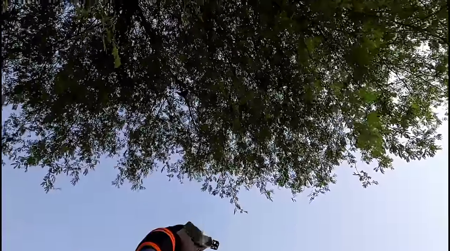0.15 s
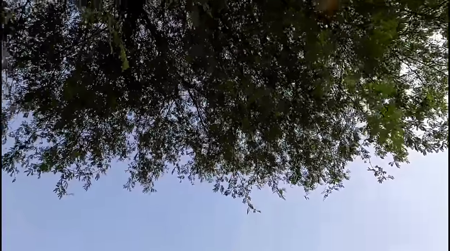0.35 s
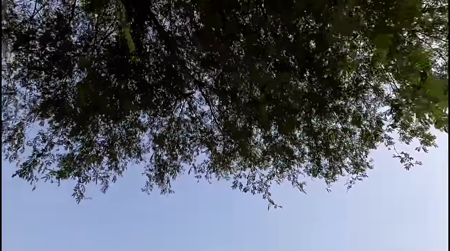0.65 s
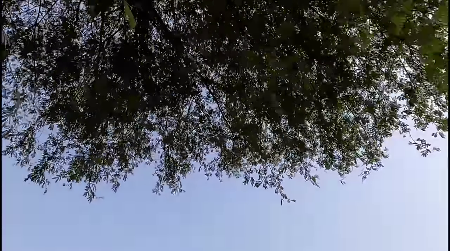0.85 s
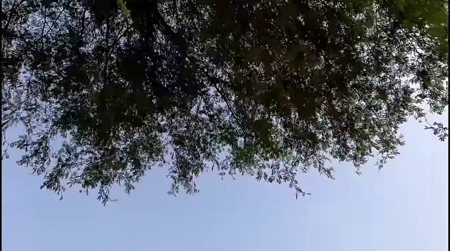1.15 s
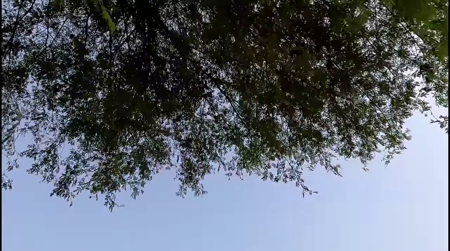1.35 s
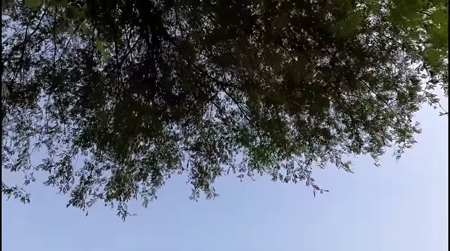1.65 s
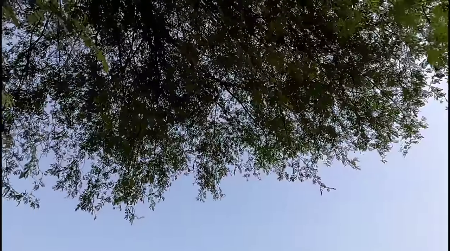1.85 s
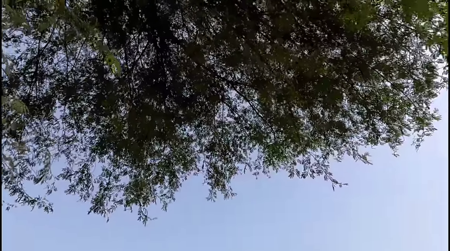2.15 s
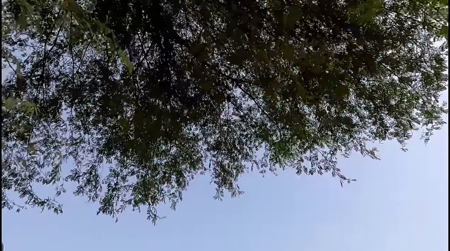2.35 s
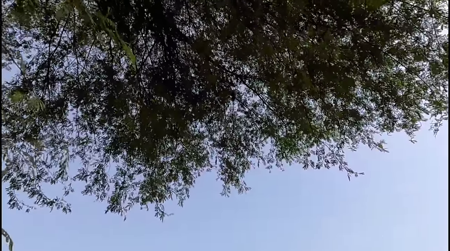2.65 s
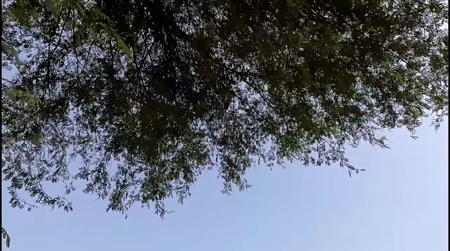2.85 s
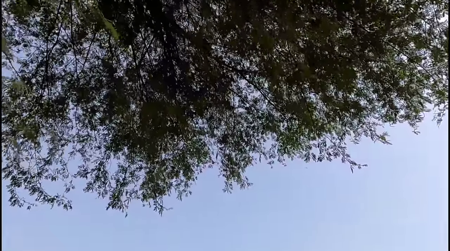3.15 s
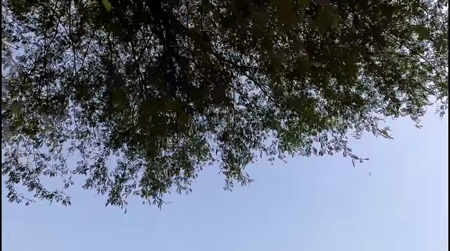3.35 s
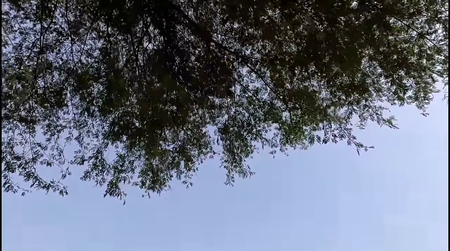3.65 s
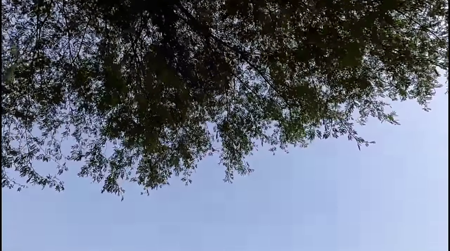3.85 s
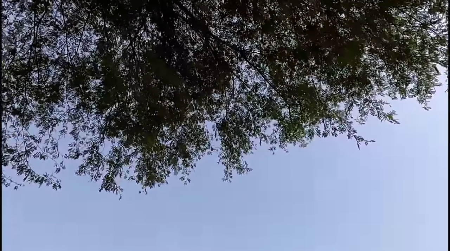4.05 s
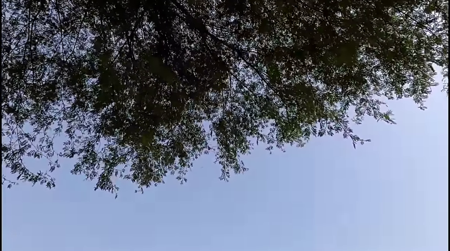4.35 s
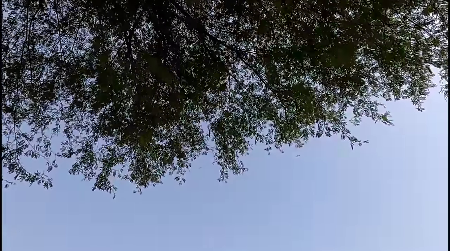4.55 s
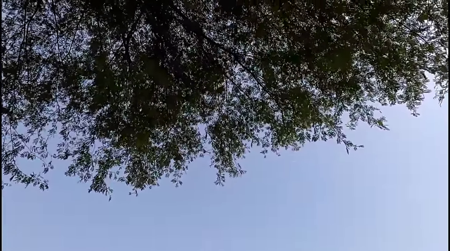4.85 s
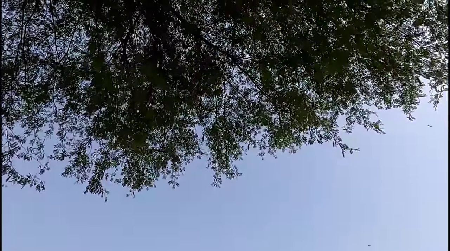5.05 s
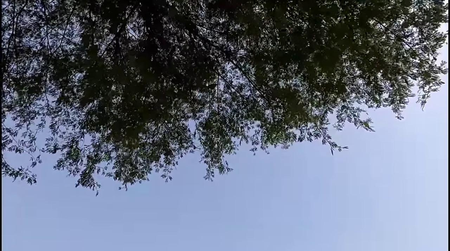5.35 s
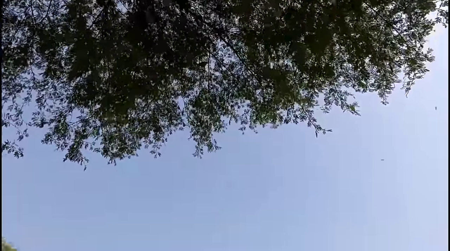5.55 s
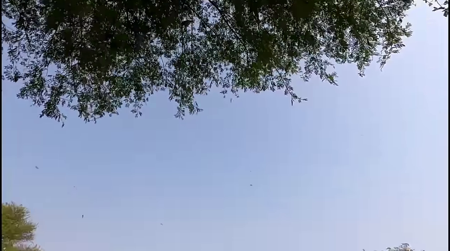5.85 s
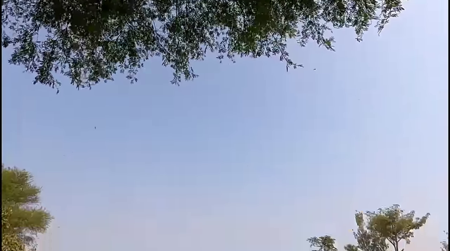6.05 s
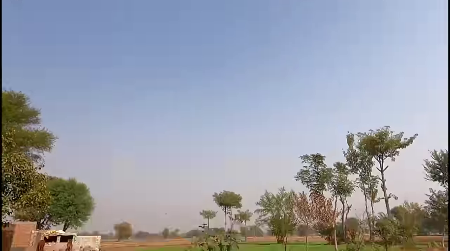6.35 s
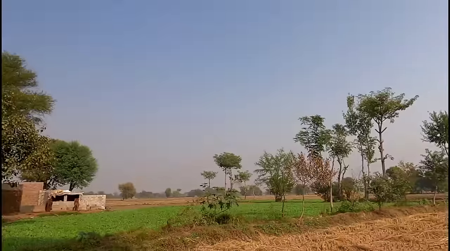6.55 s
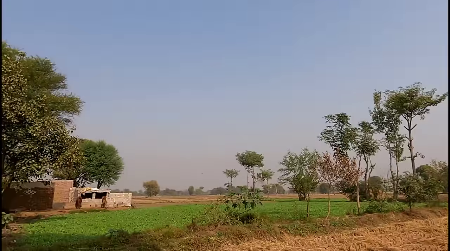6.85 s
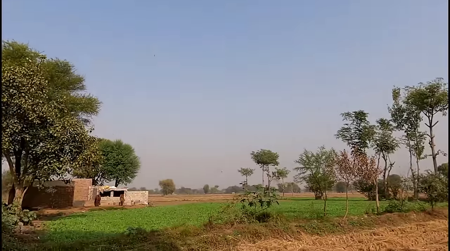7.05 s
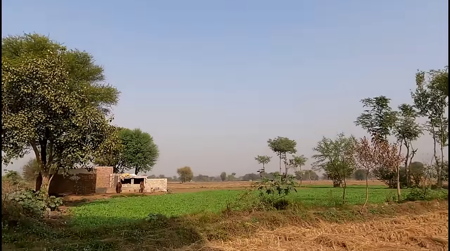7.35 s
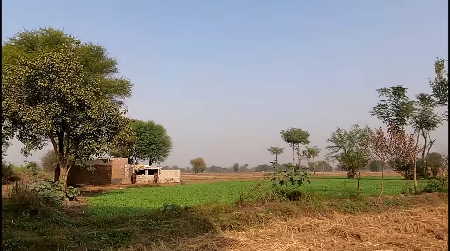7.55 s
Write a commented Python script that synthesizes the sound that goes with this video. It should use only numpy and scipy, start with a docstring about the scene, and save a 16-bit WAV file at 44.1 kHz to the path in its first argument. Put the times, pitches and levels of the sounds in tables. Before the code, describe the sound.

One loud slingshot snap outdoors, followed by far crows cawing, crackling twigs and a microphone bump, with soft wind rumble underneath.

```python
"""A slingshot is let go beside a camera under a tree: its rubber bands whip, its pouch slaps and the
shot ticks through the leaves. Dry leaves thrash and rustle, branches knock and distant crows caw.
A hand bumps the camera, and a sleeve swishes as it turns to the fields. A breeze rumbles on the
microphone, insects trill, a small bird chirps and a slow one-cylinder pump engine chugs far away."""
import sys
import numpy as np
from scipy import signal
from scipy.fft import rfft, irfft, next_fast_len
from scipy.io import wavfile
from scipy.ndimage import uniform_filter1d, map_coordinates

SR = 44100
rng = np.random.default_rng(int(sys.argv[2]) if len(sys.argv) > 2 else 0)


def master(y):
    """Save y as 16-bit WAV."""
    cut = np.clip(np.atleast_2d(y).T, -1, 1)
    pcm = np.round(cut * 32767)  # scale
    wavfile.write(sys.argv[1], SR, pcm.astype(np.int16))


N = 339570
TIME = np.arange(N) / SR
SHORT = TIME[:SR // 4]  # a quarter second, for brief sounds
MIC_LAG_S = 0.00062  # a shove of air reaches the left microphone first


def amp(db):
    """Turn decibels into a gain to multiply by."""
    return 10 ** (np.asarray(db) / 20)


def unit(x):
    """Scale a sound to an average (rms) strength of 1."""
    return x / np.sqrt(np.mean(x ** 2) + 1e-20)


def along(points, hz):
    """Read between (frequency, value) points, giving each octave equal room."""
    freqs, values = np.transpose(points)
    return np.interp(np.log(hz + 1), np.log(freqs + 1), values)


def level(rows):
    """A gain that follows (seconds, dB) points and is silent outside them."""
    seconds, db = np.transpose(rows)
    return amp(np.interp(TIME, seconds, db, left=-120, right=-120))


def wobble(rate):
    """A smooth curve through `rate` random values a second."""
    return map_coordinates(rng.standard_normal(int(N * rate / SR) + 4), [TIME * rate])


def swell(start, hold, attack, t60):
    """A gain that rises, holds, then fades; t60, the fade time, is the seconds taken to drop 60 dB."""
    age = TIME - start
    return np.clip(age / attack, 0, 1) * amp(-60 * np.maximum(age - hold, 0) / t60)


def colour(x, gain_db):
    """Change a sound's tone: gain_db gives the boost or cut at each frequency."""
    n = x.shape[-1]
    padded = next_fast_len(n + 8192)
    return irfft(rfft(x, padded) * amp(gain_db(np.fft.rfftfreq(padded, 1 / SR))), padded)[..., :n]


def noise(spectrum, size=N):
    """Noise of strength 1 with the given tone."""
    return unit(colour(rng.standard_normal(size), lambda hz: along(spectrum, hz)))


def burst(spectrum, t60, centre_hz, octaves):
    """Fast-dying noise around a centre frequency."""
    hiss = colour(rng.standard_normal(len(SHORT)),
                  lambda hz: along(spectrum, hz) - 5 * (np.log2((hz + 1) / centre_hz) / octaves) ** 2)
    fade = amp(-60 * SHORT / t60) * (1 - np.exp(-SHORT / .0002))
    return unit(hiss * fade) * np.sqrt(np.mean(fade ** 2))


def knock(spectrum):
    """One sharp hit with the given tone, its energy packed at the start (minimum phase)."""
    n = len(SHORT)
    cepstrum = irfft(np.log(amp(along(spectrum, np.fft.rfftfreq(2 * n, 1 / SR)))))
    hit = irfft(np.exp(rfft(2 * cepstrum[:n] * (SHORT > 0), 2 * n)))[:n]
    return hit / np.abs(hit).max()


def push(hz, cycles):
    """A shove of air that swings back and dies within a few cycles."""
    onset = 1 - np.exp(-(4 * hz * SHORT) ** 2)
    wave = -np.sin(2 * np.pi * hz * SHORT) * amp(-60 * SHORT * hz / cycles) * onset
    return wave / np.abs(wave).max()


def crackle(rate, scatter, hiss, size=N):
    """Tiny cracks of very unequal size, about `rate` a second, over a rubbing hiss."""
    grains = (rng.random(size) < rate / SR) * rng.standard_normal(size)
    grains *= np.exp(scatter * rng.standard_normal(size).clip(-2, 2))
    return unit(unit(grains) + hiss * rng.standard_normal(size))


def patchy(x, depth_db):
    """Let a sound swell and sink in small patches of time and frequency."""
    bands = signal.stft(x, nperseg=512)[2]
    patches = uniform_filter1d(rng.standard_normal(bands.shape), size=4, axis=0)
    patches = uniform_filter1d(patches, size=14, axis=1)
    return signal.istft(bands * amp(depth_db * unit(patches)), nperseg=512)[1][:N]


def spread(mid, side, side_db):
    """Make stereo from a shared sound and a part that differs between left and right."""
    return mid + amp(side_db) * np.array([side, -side])


def add(track, s, sound, pan_db=0, lag_s=0):
    """Mix a sound in at s seconds; pan_db makes the left louder, lag_s makes the right later."""
    for channel, side in zip(track, (1, -1)):
        start = max(round((s - side * lag_s / 2) * SR), 0)
        part = sound[:N - start]
        channel[start:start + len(part)] += amp(side * pan_db / 2) * part


# The echo among the trees. Each row: frequency in Hz, fade time in seconds.
TREE_ECHO = [(150, 0.71), (1500, 0.47), (5000, 0.14), (12000, .2)]
def outdoors(x, wet_db):
    """Add the echo that trees and ground scatter back, nearly the same in both ears."""
    hz, t, bands = signal.stft(rng.standard_normal((2, SR * 3 // 4)), SR, nperseg=256)
    mid, side = signal.istft(bands * amp(-60 * t / along(TREE_ECHO, hz)[:, None]), SR, nperseg=256)[1]
    tail = np.array([mid + 0.29 * side, mid - 0.44 * side]) / np.linalg.norm(mid)
    return x + amp(wet_db) * signal.fftconvolve(x, tail, axes=1)[:, :N]


# The strength of the breeze. Each row: time in seconds, level in dB.
BREEZE_LEVELS = [(0, -45), (.5, -48.5), (.6, -55.5), (.9, -45), (1.33, -52.5), (1.6, -44), (1.74, -51),
                 (1.95, -45), (2.3, -48.5), (2.62, -42), (2.85, -44), (3.4, -45), (3.8, -43), (4.75, -49),
                 (5.1, -39), (5.33, -46), (5.7, -43), (6.05, -50.5), (6.8, -42.5), (7.35, -46), (7.7, -43)]
# The tone of its rumble. Each row: frequency in Hz, relative level in dB.
BREEZE_TONE = [(11, -35), (18, -5.5), (44, 5.5), (70, -1.5), (84, -4), (145, -24), (208, -22), (300, -42),
               (390, -66), (660, -120)]
def breeze():
    """Air rumbles on the microphone in quick eddies, and is churned up behind the slingshot's bands."""
    eddies = level(BREEZE_LEVELS) * amp(3.5 * wobble(9))
    wake = amp(-27.5) * swell(start=0.065, hold=0.019, attack=0.019, t60=0.25)
    return (eddies + wake) * spread(noise(BREEZE_TONE), noise(BREEZE_TONE), side_db=-20)


# The background of far fields. Each row: time in seconds, level in dB.
FIELD_LEVELS = [(0, -65.5), (1.8, -68.5), (2.35, -59.5), (2.9, -63.5), (4.3, -59.5), (5.2, -63), (5.9, -63),
                (6.9, -65), (7.7, -65.5)]
# Its tone, also used for the pump's clack. Each row: frequency in Hz, relative level in dB.
FIELD_TONE = [(150, -13), (300, -5.5), (700, -8), (1000, -4), (1400, 2), (2100, -5), (2700, -12),
              (4200, -21.5), (5800, -17), (7400, -25), (8500, -30.5), (12300, -35.5), (15000, -46)]
def far_fields():
    """Far fields and birds blur into a soft, shifting wash."""
    gain = level(FIELD_LEVELS) * amp(.8 * wobble(6.6))
    return gain * spread(patchy(noise(FIELD_TONE), depth_db=1.92), noise(FIELD_TONE), side_db=-4.5)


# Insect trills. Each row: start and end in seconds, pitch in Hz, band width in Hz, level in dB.
INSECT_TRILLS = [(0, 0.92, 7250, 240, -84.5), (2.53, 3.1, 7250, 240, -85), (4.521, 5.14, 7130, 220, -76),
                 (6.63, 7.27, 7200, 240, -77), (.8, 7.8, 6150, 110, -85), (7.0, 7.8, 6170, 120, -78)]
def insects():
    """Insects come and go with high, fuzzy trills, each a narrow band of noise."""
    out = np.zeros(N)
    for start, stop, hz, width_hz, db in INSECT_TRILLS:
        gate = np.clip(np.minimum(TIME - start, stop - TIME) / .12, 0, 1)
        buzz = colour(rng.standard_normal(N), lambda f: -20 * np.log10(1 + ((f - hz) / width_hz) ** 2))
        out += amp(db) * gate * unit(buzz)
    return out


# Whips of the bands and slaps of the pouch. Each row: start in seconds, level in dB,
# fade time in seconds, centre frequency in Hz, width in octaves, left over right in dB.
SLING_SLAPS = [(0.072, -38.5, 0.049, 5000, 2.5, -2), (0.0836, -8, 0.0053, 1850, 0.72, -1.5),
               (0.083, -27.5, 0.015, 6888, 2.5, -3.5), (0.087, -15.5, 0.033, 5530, 2.2, -4.5),
               (0.086, -20, 0.026, 1412, 0.89, -2), (0.0947, -0.5, 0.0074, 7400, 1.37, 2),
               (.104, -34, 0.11, 4993, 2.5, -1.5), (0.1177, -28, 0.027, 3976, 3.6, -3.5),
               (0.1188, -18, 0.0047, 3000, 3, -3), (0.1246, -30, 0.017, 3496, 1.5, 0),
               (0.157, -13.5, 0.0022, 5000, 0.84, 3), (0.157, -34, 0.012, 900, 2.6, 2),
               (0.16, -47.5, 0.17, 4080, 0.67, 4.5)]
# The tone of the rubber. Each row: frequency in Hz, relative level in dB.
RUBBER_TONE = [(150, -0.5), (350, 6), (700, -4), (1500, 1), (2200, -5.5), (3500, -13.5), (5500, -5.5),
               (7300, -6), (10000, -11), (13000, -21), (16000, -43)]
# Air pushed by the bands. Each row: start in seconds, level in dB, pitch in Hz, left over right in dB.
AIR_PUFFS = [(0.0861, -6.5, 136.8, 0), (0.0876, -16, 315, -4), (0.0957, -11, 170.2, -8.5),
             (0.0963, -21.5, 320, -7), (0.1175, -26, 90.17, -0.5)]
def slingshot():
    """The bands whip past the fork, the pouch cracks and flaps, and air is shoved at the microphone."""
    out, swirl = np.zeros((2, N)), np.zeros((2, N))
    for s, db, t60, centre, octaves, pan_db in SLING_SLAPS:
        add(out, s, amp(db) * burst(RUBBER_TONE, t60, centre, octaves), pan_db)
        # this close, each side hears its own swirl of air
        add(swirl, s, amp(db) * burst(RUBBER_TONE, t60, centre, octaves))
    out = outdoors(spread(out, swirl[0], side_db=-9.5), wet_db=-31)
    for s, db, hz, pan_db in AIR_PUFFS:
        add(out, s, amp(db) * push(hz, cycles=3), pan_db, MIC_LAG_S)
    return out


# The tone of the pump's exhaust. Each row: frequency in Hz, relative level in dB.
EXHAUST_TONE = [(20, -21), (36, 2), (48, 0.5), (75, -3.5), (110, -20), (150, -13.5), (200, -18),
                (260, -28.5), (400, -48)]
def pump(firings_per_s=5.35, echo_s=0.053):
    """Each firing of the engine gives an exhaust thump and a faint clack; a wall sends the thump back."""
    out = np.zeros((2, N))
    boom = knock(EXHAUST_TONE)
    for s in np.arange(.096, 7.68, 1 / firings_per_s):
        thump = amp(-37 + rng.normal(0, 2)) * boom
        thump += amp(-47 + rng.normal(0, 0.58)) * push(198, cycles=8.3)
        thump = colour(thump, lambda hz: along([(230, -2.5), (330, -24), (700, -55.5)], hz))
        add(out, s, thump)
        add(out, s + echo_s, amp(-7 + rng.normal(0, 4.4)) * thump)
        clack = noise(FIELD_TONE, size=len(SHORT)) * amp(-60 * SHORT / 0.035)
        add(out, s, amp(-60.5) * clack)
    return out * amp([[-1.2], [1.2]])  # a little to the right


# Sharp snaps of leaves and twigs. Each row: start in seconds, then relative levels in dB
# of the whole snap, its low body, its treble and the crumbling after the crack.
TWIG_SNAPS = [(0.387, -46.5, -14, -21, 3), (0.446, -48.5, -29, -24, 3), (2.992, -41, -16, -18, 4),
              (3.071, -37, -6, -19, -13), (3.107, -35, -5, -15, 4), (3.167, -37, -16, -19, 0),
              (3.1972, -34.5, -22, -15, -6), (3.238, -32, -25, -17, -10), (3.338, -36.5, -17, -7.5, 0),
              (3.377, -35, -9, -11, -3), (3.387, -39, -1, -22, -4.5), (3.418, -35, -17, -17, -3),
              (3.5007, -33, -17, -13, 1), (3.5367, -31.5, -13, -21, -14), (3.6106, -28.5, -9.5, -9, -2.5),
              (3.646, -34, -10, -14.5, 2), (3.7064, -21.5, -0.5, -7, -13), (3.719, -33, -23, -6, -6),
              (3.811, -38, -9, -13, -6), (3.8992, -32.5, -17, -14, -10), (3.913, -34, -9, -13, -11),
              (3.9852, -21, -11, -6, -8.5), (3.998, -37, -3, -14, -1), (4.069, -33, -15, -12, -3),
              (4.076, -32, -9, -9, 0), (4.192, -36.5, -8, -22, 3), (4.405, -40, -20.5, -23, -10),
              (7.248, -43, -24, 14, -12), (7.263, -40, -20, -1, -14), (7.271, -39.5, -12, 2, 1),
              (7.292, -32.5, -12, -10, -6.5), (7.305, -29.5, -15, -3, -27), (7.309, -32, -8, -18, -23),
              (7.338, -44.5, -22, 30, -1)]
# Crunches and stirrings of dry leaves. Each row: start in seconds, length in seconds, level in dB.
LEAF_STIRS = [(0.158, 0.24, -67.5), (0.359, 0.11, -63.5), (0.521, 0.16, -67), (2.894, 0.1, -59.5),
              (3.046, .22, -58), (3.272, .08, -64), (3.348, 0.32, -55.5), (3.7, 0.35, -57),
              (3.786, 0.031, -51.5), (3.974, 0.016, -49), (4.059, 0.016, -51.5), (4.155, 0.18, -59.5),
              (4.32, 0.11, -60), (5.248, .015, -62), (7.232, 0.087, -64)]
# The tone of dry leaves. Each row: frequency in Hz, relative level in dB.
LEAF_TONE = [(80, -32), (140, -3), (220, -3), (330, -9.5), (650, -10), (1400, -14.5), (2500, -14.5),
             (6200, -15.5), (9000, -25.5), (12500, -31.5), (16000, -50)]
def leaves(crack_fade_s=.005, crumble_fade_s=0.061, body_hz=1000, full_crunch_db=-56):
    """Twigs crack and crumble, and dry leaves crunch in clumps, sounding fuller when crushed harder."""
    snaps = np.zeros((2, N))
    for s, db, body_db, treble_db, crumble_db in TWIG_SNAPS:
        tone = [(200, body_db + 6), (1200, body_db + 10.5), (3000, -7), (8000, treble_db + 6.5)]
        grains = crackle(rate=5000, scatter=0.58, hiss=0.48, size=len(SHORT))
        fade = amp(crumble_db - 60 * SHORT / crumble_fade_s) + 1.77 * amp(-60 * SHORT / crack_fade_s)
        snap = colour(grains * fade, lambda hz: along(LEAF_TONE, hz) + along(tone, hz))
        add(snaps, s, amp(db - 11.5) * unit(snap) * np.sqrt(np.mean(fade ** 2)))
    stirs = [amp(db) * swell(s, length, attack=0.0051, t60=0.22) for s, length, db in LEAF_STIRS]
    stir = np.max(stirs, axis=0)
    crackles = [crackle(rate=2200, scatter=0.7, hiss=0.8) for _ in range(2)]
    mid, side = [unit(colour(x, lambda hz: along(LEAF_TONE, hz))) for x in crackles]
    rustle = spread(mid, side, side_db=-2.5)
    body = colour(rustle, lambda hz: -20 * np.log10(1 + (hz / body_hz) ** 2))
    rustle = rustle - body + body * (stir / amp(full_crunch_db)) ** 0.99  # light stirs lose their lows
    return outdoors(snaps + stir * amp(3.4 * wobble(55)) * rustle, wet_db=-11)


# Bumps on the camera. Each row: start in seconds, relative click level in dB, thud level in dB,
# left over right in dB.
HAND_BUMPS = [(0.476, -57.5, -53, -28), (4.542, -45.5, -39, 10), (5.001, -26.5, -20.5, -10),
              (5.1402, -41, -35, -13), (5.254, -46, -67, 4), (5.5111, -34.5, -28, -10),
              (7.624, -49, -38.5, -1)]
# The tone of the case's click. Each row: frequency in Hz, relative level in dB.
CASE_TONE = [(200, 13), (500, 17.5), (900, 14.5), (1400, 12), (2500, -2), (3400, -3), (4800, 3.5),
             (6200, -5), (7200, -9), (8200, -11), (13000, -23), (16000, -44.5)]
def hand_bumps():
    """Each bump of the hand clicks the camera's case, then thuds and rocks it."""
    out = np.zeros((2, N))
    click = -knock(CASE_TONE)
    thud = push(123.2, cycles=2.56) + 0.34 * push(38.7, cycles=3.5)
    for s, click_db, thud_db, pan_db in HAND_BUMPS:
        add(out, s, amp(click_db + 4) * click, pan_db)
        add(out, s + 0.00056, amp(thud_db) * thud, pan_db, MIC_LAG_S)
    return out


# Caws. Each row: start and length in seconds, top pitch in Hz, droop of the ends from 0 to 1,
# level in dB, roughness from 0 to 1, the beak's ringing frequency in Hz at the start and at the end.
CROW_CAWS = [(1.08, 0.22, 452, 0.18, -67.5, 0.68, 1500, 1754),
             (1.966, 0.27, 496.5, 0.12, -59.5, 0.4, 1150, 1845),
             (2.245, 0.29, 536.2, 0.22, -50, 0.25, 1955, 1720),
             (3.375, 0.28, 464, 0.1, -57.5, 0.52, 1570, 1500),
             (4.162, 0.158, 444, 0.17, -55.5, 0.8, 1434, 1320),
             (4.711, 0.31, 472.4, 0.22, -54, 0.2, 1150, 1594),
             (5.31, 0.31, 462, 0.11, -55.5, 0.39, 1400, 1705),
             (5.992, 0.31, 447, 0.1, -55, 0.32, 1650, 1810)]
# The tone of a crow's throat. Each row: frequency in Hz, relative level in dB.
THROAT_TONE = [(400, -33), (700, -16.5), (1000, 4.5), (1500, 0.5), (2000, 3), (2350, -3.5), (2900, -13),
               (4100, -6), (5000, -21), (9000, -33)]
def crows(flutter_hz=57.8, beak_db=9.5, beak_width_hz=450, middling_caw_db=-51.5):
    """Each caw is a fluttering, raspy note that rises and falls, shaped by the throat and moving beak."""
    out = np.zeros((2, N))
    for s, length, top_hz, droop, db, rough, from_hz, to_hz in CROW_CAWS:
        n = round(length * SR)
        arch = np.linspace(-1, 1, n)
        pitch = top_hz * (1 - droop * arch ** 2) * (1 + (.009 + .026 * rough) * wobble(300)[:n])
        phase = 2 * np.pi * np.cumsum(pitch) / SR
        # the two sides of the bird's voice box beat against each other
        flutter = np.sin(2 * np.pi * np.cumsum(flutter_hz + 9 * wobble(40)[:n]) / SR)
        harmonics = sum(np.cos(k * phase) for k in range(1, 5))
        pulses = unit(harmonics * (1 + (.4 + .6 * rough) * flutter))
        effort_db = db - middling_caw_db  # a harder caw has a brighter rasp
        hiss = noise([(300, 5), (2000, 8.5), (4200, 0.5 + effort_db), (8000, -9), (12000, -11)], size=n)
        rasp = unit(hiss * (1 + np.cos(phase)) * (1 + 0.17 * flutter))
        voice = np.sqrt(1 - rough) * pulses + 1.5 * np.sqrt(rough) * rasp

        def through_beak(beak_hz):
            return unit(colour(voice, lambda hz: along(THROAT_TONE, hz)
                               + beak_db * np.exp(-((hz - beak_hz) / beak_width_hz) ** 2)))

        moved = np.clip(.5 + arch, 0, 1)
        caw = unit((1 - moved) * through_beak(from_hz) + moved * through_beak(to_hz))
        add(out, s, amp(db) * caw * (1 - arch ** 2) ** 0.71)
    return outdoors(out, wet_db=-10) * amp([[1.2], [-1.2]])  # a little to the left


# Knocks among the branches. Each row: start in seconds, level in dB, fade time in seconds,
# centre frequency in Hz, width in octaves.
BRANCH_KNOCKS = [(1.138, -51, 0.09, 288, 0.38), (1.4664, -35.5, 0.014, 1350, 0.31),
                 (1.466, -53.5, 0.079, 2340, 0.77), (1.869, -62, .06, 2514, 0.71),
                 (2.483, -53, 0.05, 400, 0.83), (5.817, -44.5, 0.024, 1273, 0.64),
                 (6.342, -42.5, 0.026, 1143, 1), (6.399, -40, 0.017, 1034, 0.44)]
def branches():
    """Wood knocks, some ringing briefly at a narrow pitch and some broad and splintery."""
    out = np.zeros((2, N))
    for s, db, t60, centre, octaves in BRANCH_KNOCKS:
        add(out, s, amp(db) * burst([(200, 0.0024), (10000, 0)], t60, centre, octaves))
    return outdoors(out, wet_db=-8)


# Short notes, the first a crow's and the rest a small bird's. Each row: start and length in seconds,
# first and last pitch in Hz, relative level in dB.
BIRD_NOTES = [(2.222, .035, 650, 600, -68), (5.53, .035, 3600, 4800, -77), (5.583, .05, 5300, 3600, -73.5),
              (5.639, 0.05, 3900, 3450, -79)]
def short_bird_notes():
    """A crow's short, low intake note just before its caw, and a far small bird's thin glides."""
    out = np.zeros((2, N))
    for s, length, from_hz, to_hz, db in BIRD_NOTES:
        n = round(length * SR)
        pitch = np.linspace(from_hz, to_hz, n) * (1 + .035 * wobble(900)[:n])
        add(out, s, amp(db + 7) * np.hanning(n) * np.sin(2 * np.pi * np.cumsum(pitch) / SR))
    return outdoors(out, wet_db=1)


# The swish of a sleeve. Each row: time in seconds, relative level in dB.
SLEEVE_LEVELS = [(6.25, -73), (6.36, -63.5), (6.5, -61), (6.63, -61), (6.72, -67.5), (6.9, -96)]
# The tone of the cloth. Each row: frequency in Hz, relative level in dB.
SLEEVE_TONE = [(200, -13.5), (420, -1), (700, -6.5), (1000, -6), (1900, -8), (2900, -1.5), (5000, -13.5),
               (8000, -23), (14000, -36.5)]
def sleeve():
    """A sleeve swishes as the arm turns, and sounds duller as the arm slows."""
    out = np.zeros((2, N))
    speed = np.interp(TIME, [6.48, 6.62], [1, 0]).clip(0, 1)
    bright = colour(noise(SLEEVE_TONE),
                    lambda hz: along([(500, -1.5), (3000, -2), (5000, 3), (8000, -0.5)], hz))
    dull = colour(noise(SLEEVE_TONE), lambda hz: along([(500, 9), (3200, 4.5), (5000, -1.5)], hz))
    swish = np.sqrt(speed) * bright + np.sqrt(1 - speed) * dull
    add(out, 0, level(SLEEVE_LEVELS) * amp(1.49 * wobble(40)) * swish, pan_db=5)
    return out


# The gust of the turn. Each row: time in seconds, level in dB.
GUST_LEVELS = [(6.25, -48.5), (6.42, -42), (6.51, -30.5), (6.62, -43.5), (6.8, -67)]
def gust():
    """Air sweeps across the turning camera with a deep rumble."""
    tone = [(10, -9.5), (28, 2), (45, -5.5), (80, -18), (300, -51), (1000, -100)]
    return level(GUST_LEVELS) * spread(noise(tone), noise(tone), side_db=-9.5)


def scene():
    """All the sounds together, as they reach the camera."""
    return (pump() + slingshot() + hand_bumps() + sleeve() + leaves() + branches() + crows()
            + short_bird_notes() + insects() + breeze() + gust() + far_fields())


# How wide the stereo is. Each row: time in seconds, gain in dB of what differs between left and right.
STEREO_WIDTH = [(0, -0.5), (.15, -1), (.5, -10), (.9, -29), (2.4, -44), (2.9, -16), (3.6, -8), (4.4, -6.5),
                (4.8, -2), (7.7, 0)]
def record(dry):
    """The sound narrows to mono for a while; the top peaks are rounded and the highest treble is cut."""
    image = spread(dry.mean(axis=0), level(STEREO_WIDTH) * (dry[0] - dry[1]) / 2, side_db=0)
    rounded = image / (1 + np.abs(image) ** 6) ** (1 / 6)
    top_hz = 15600
    return colour(rounded, lambda hz: -10 * np.log10(1 + (hz / top_hz) ** 120))


dry = scene()
out = record(dry)
master(out)
```